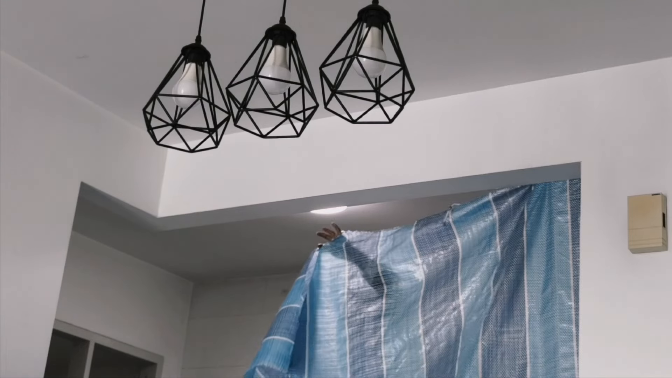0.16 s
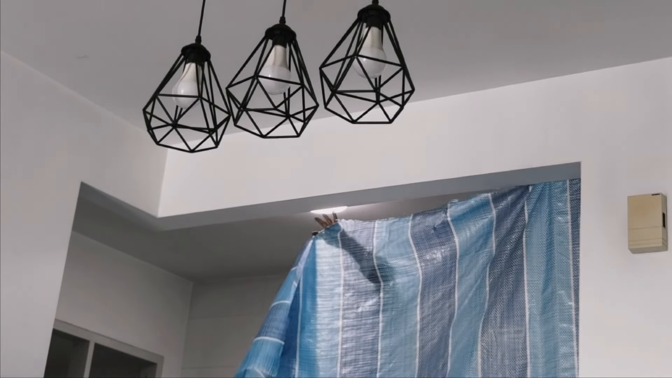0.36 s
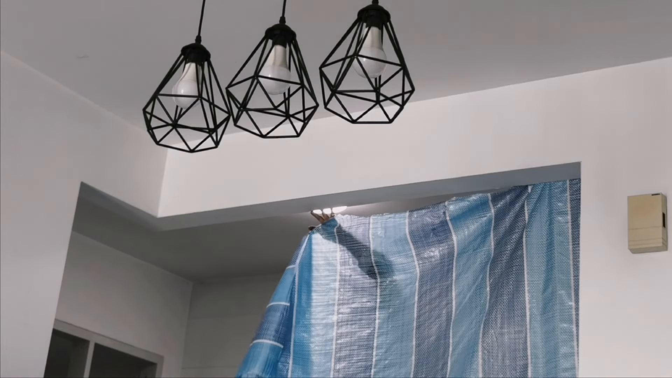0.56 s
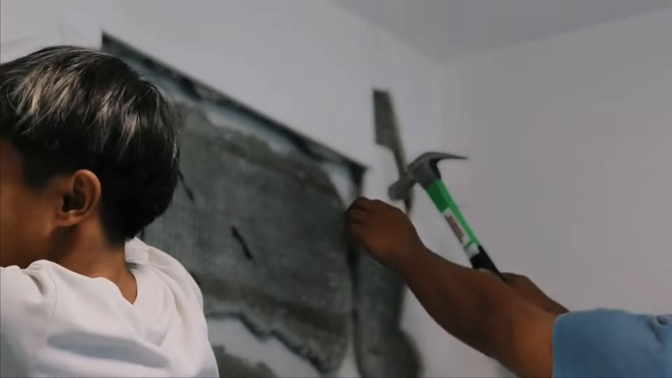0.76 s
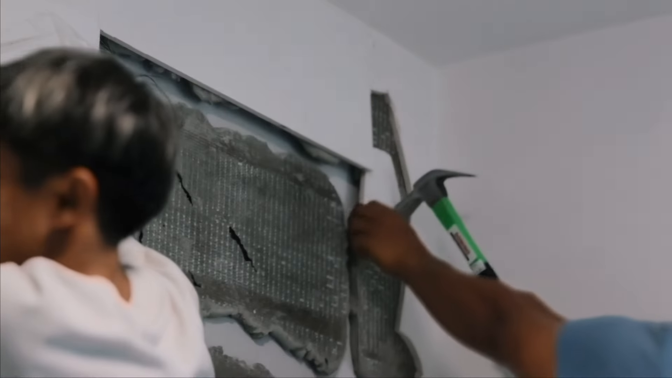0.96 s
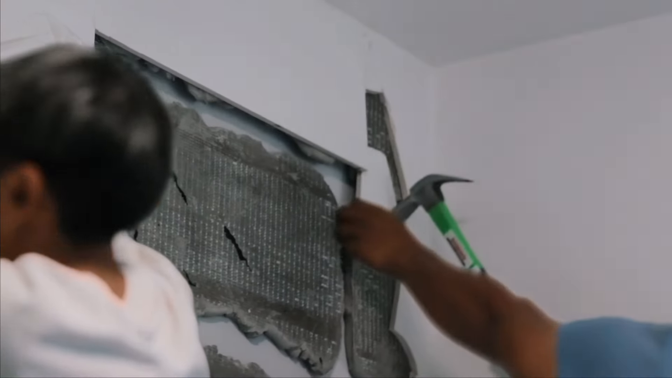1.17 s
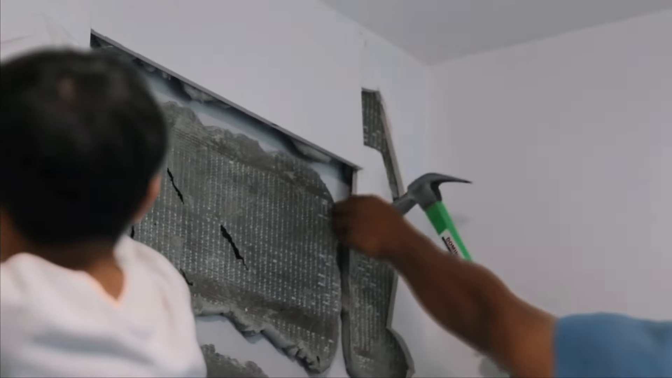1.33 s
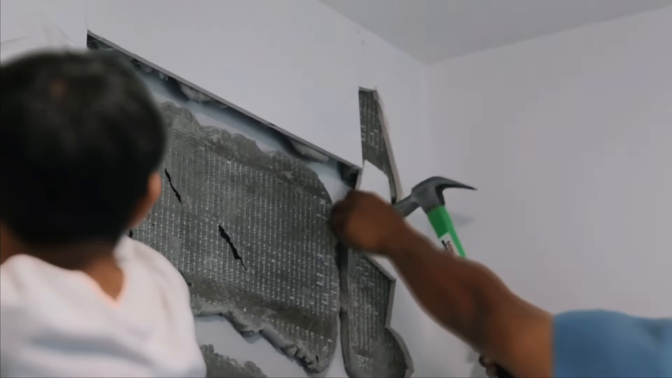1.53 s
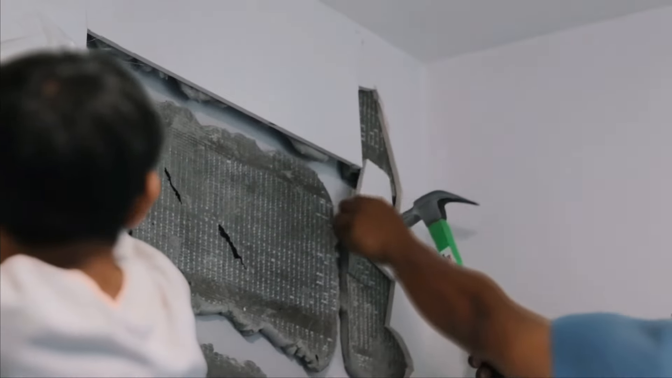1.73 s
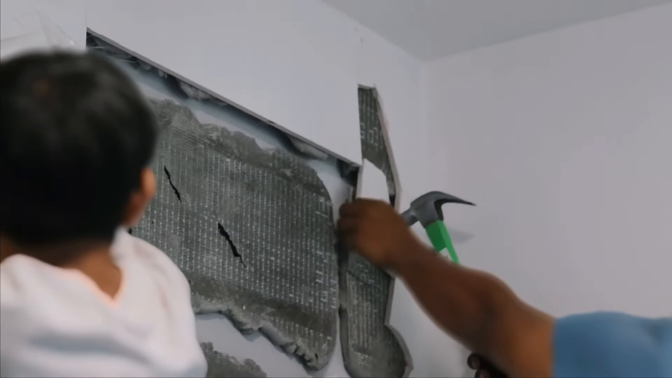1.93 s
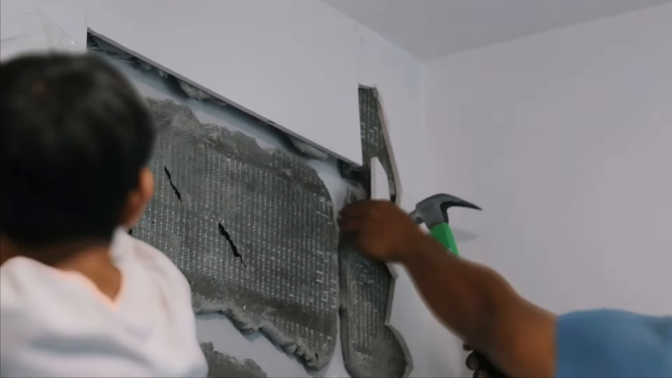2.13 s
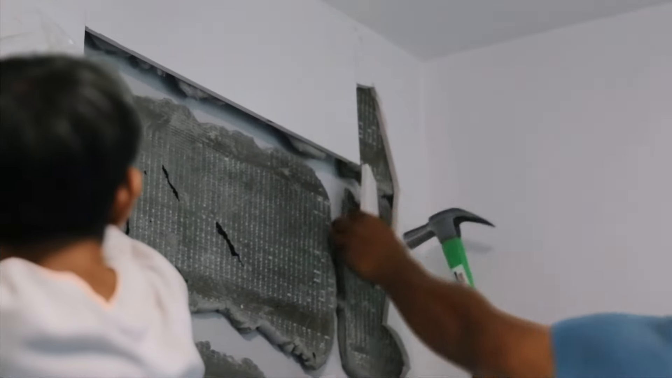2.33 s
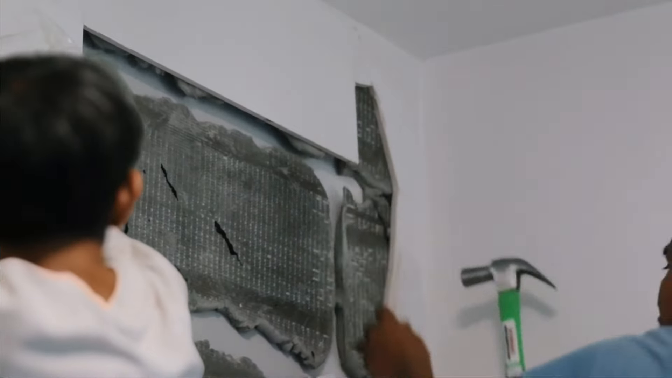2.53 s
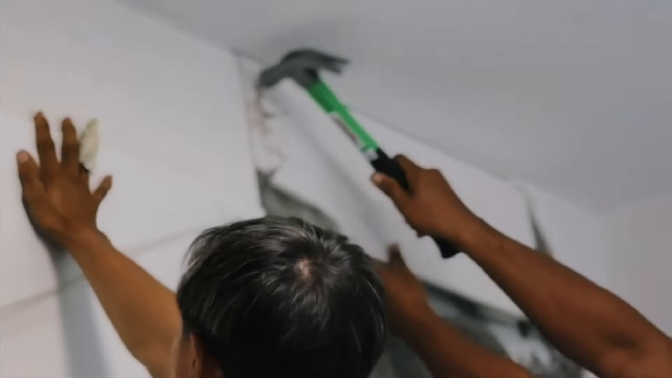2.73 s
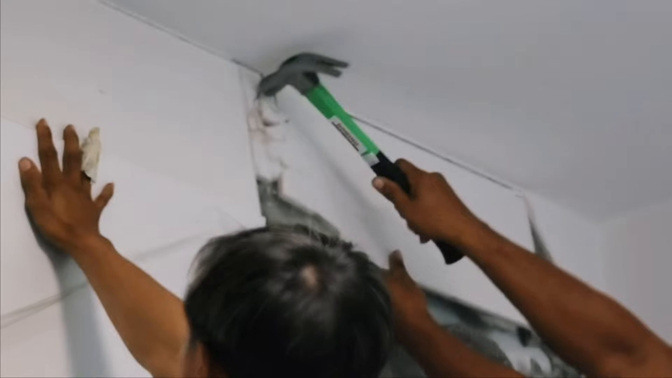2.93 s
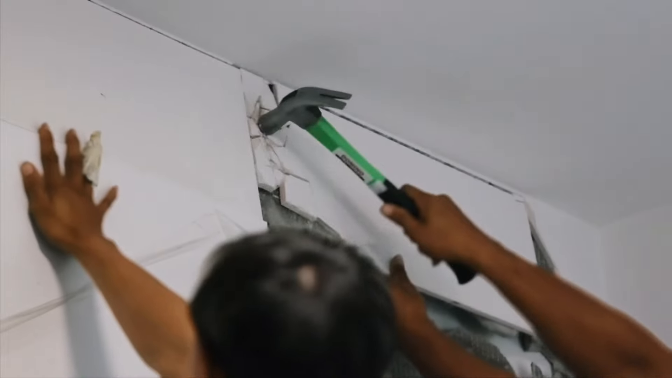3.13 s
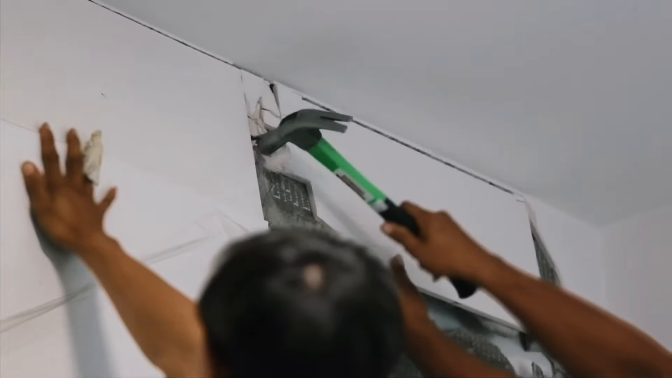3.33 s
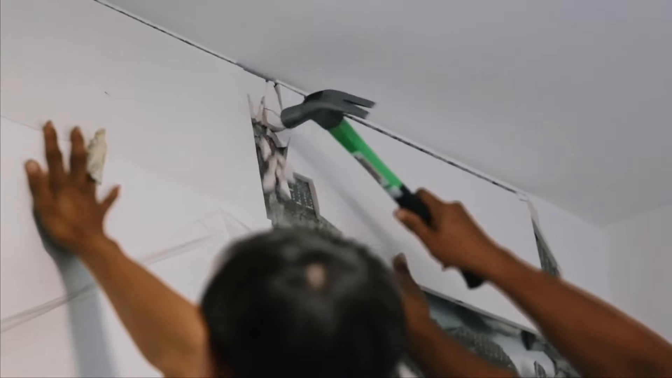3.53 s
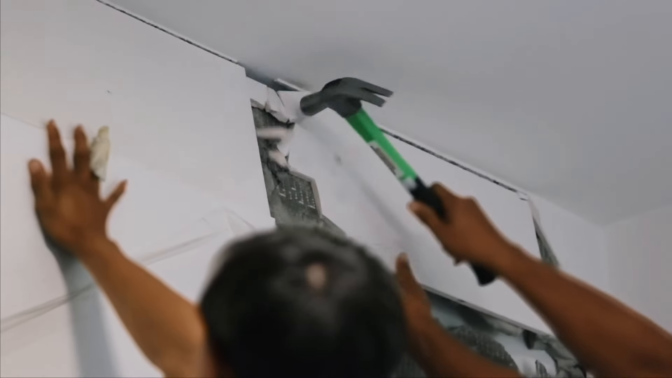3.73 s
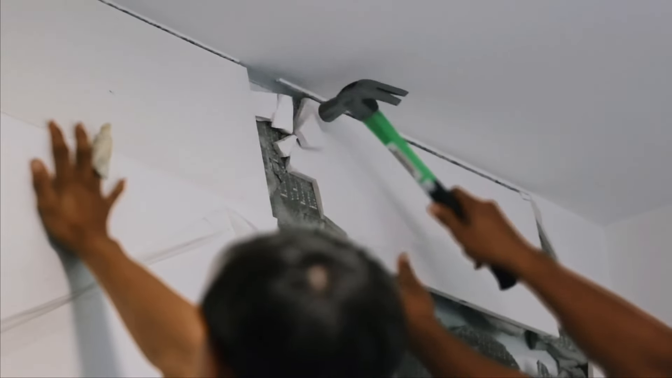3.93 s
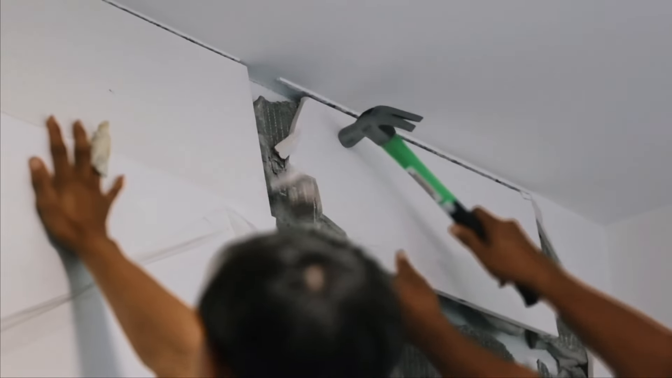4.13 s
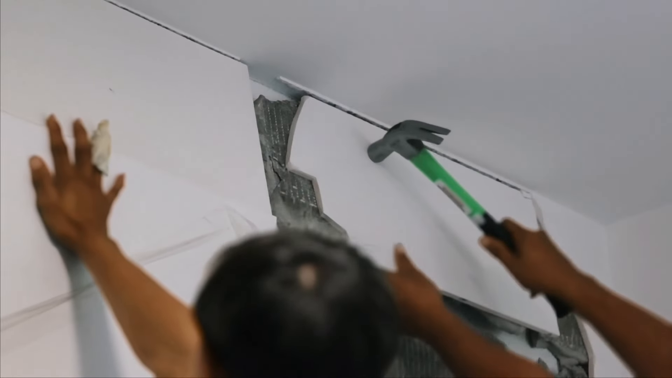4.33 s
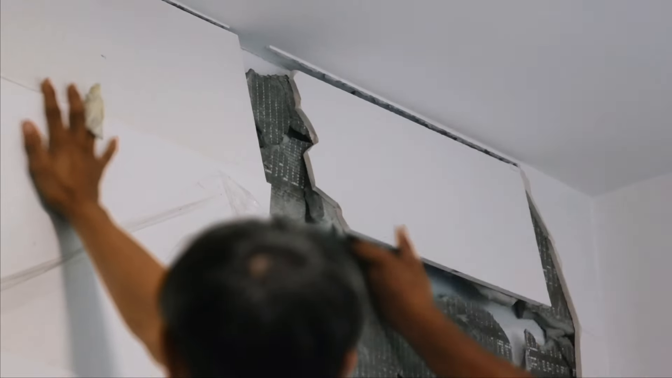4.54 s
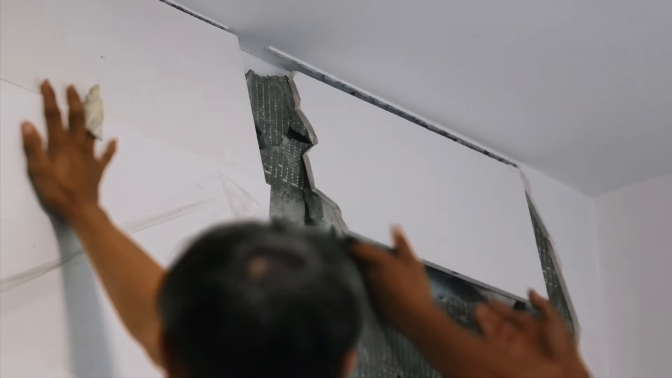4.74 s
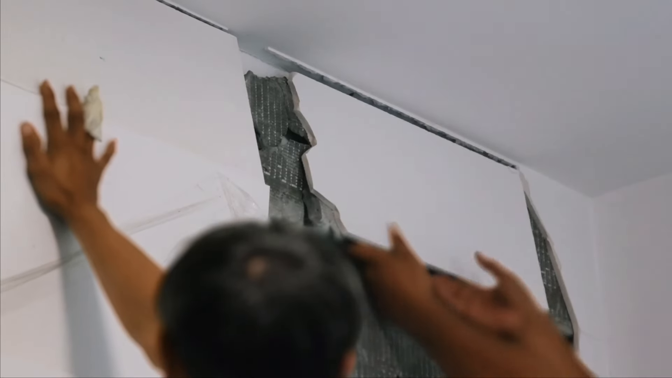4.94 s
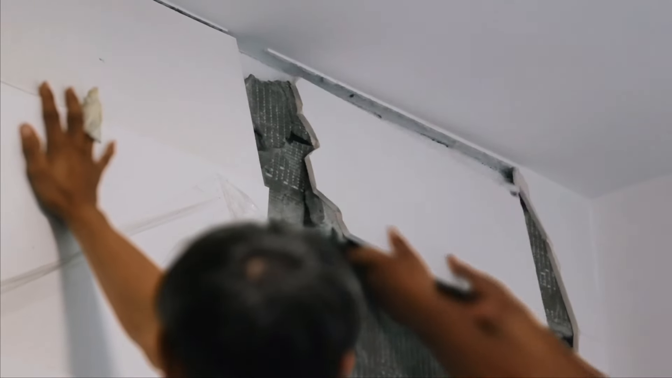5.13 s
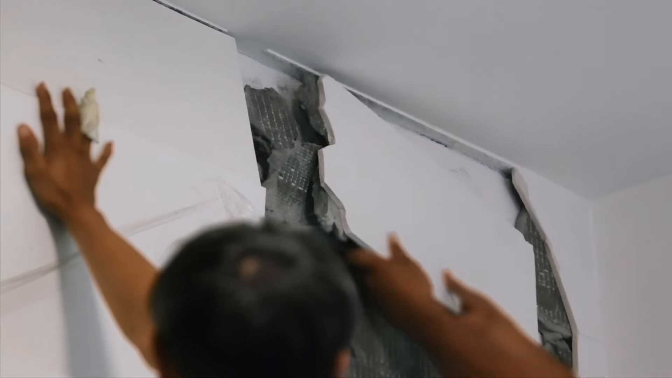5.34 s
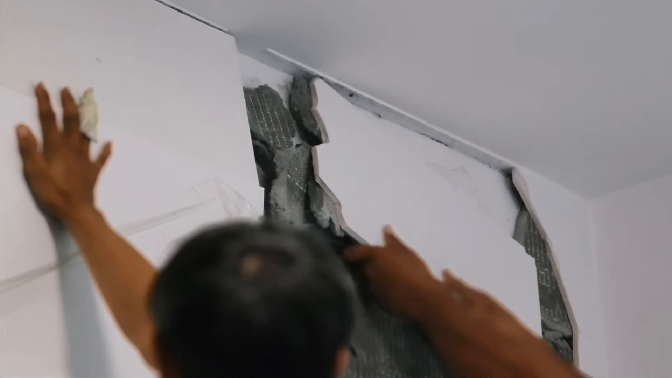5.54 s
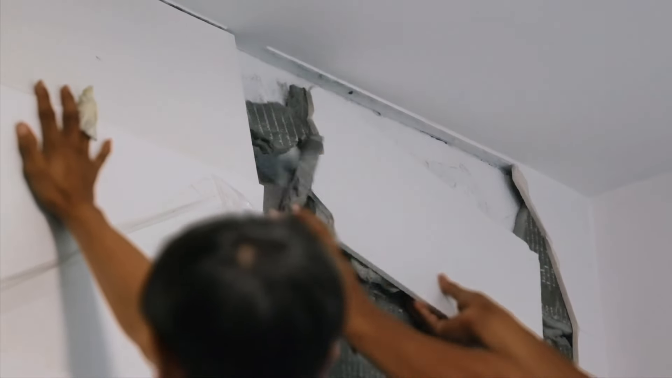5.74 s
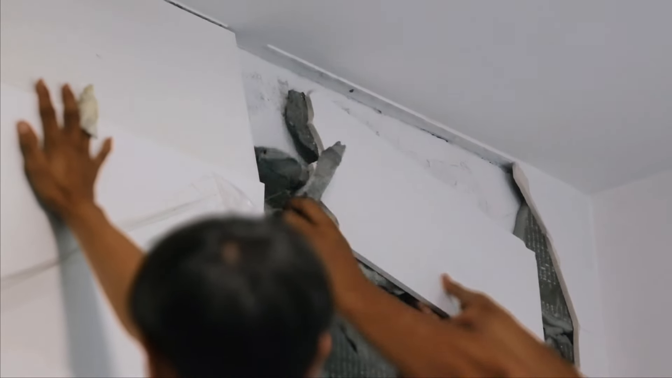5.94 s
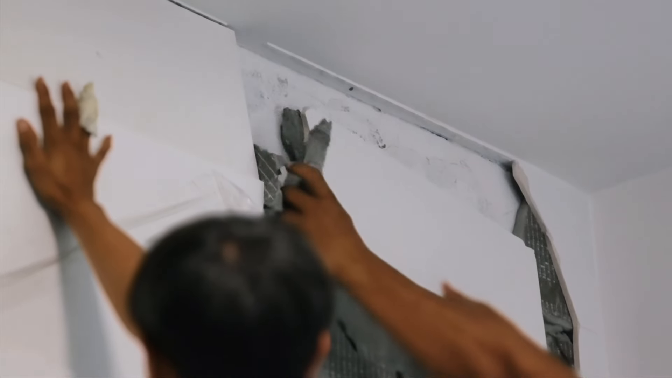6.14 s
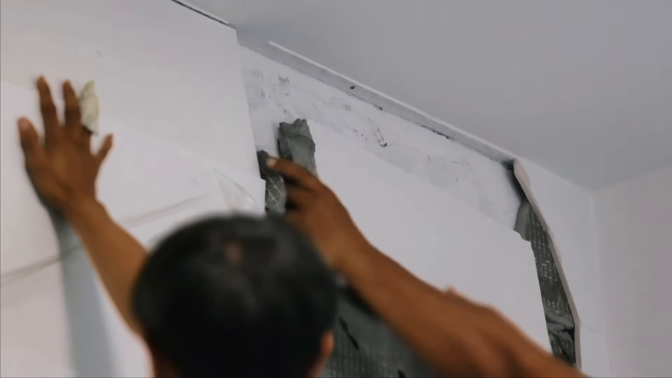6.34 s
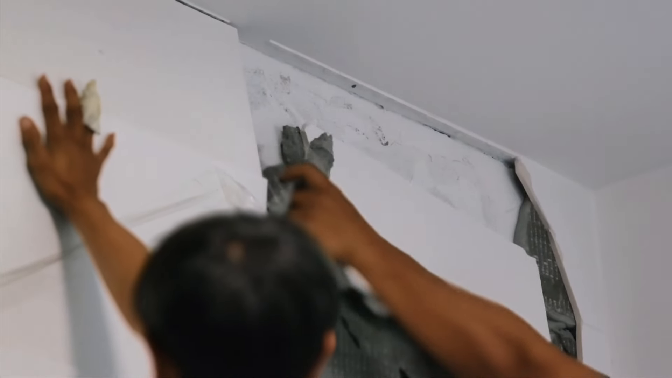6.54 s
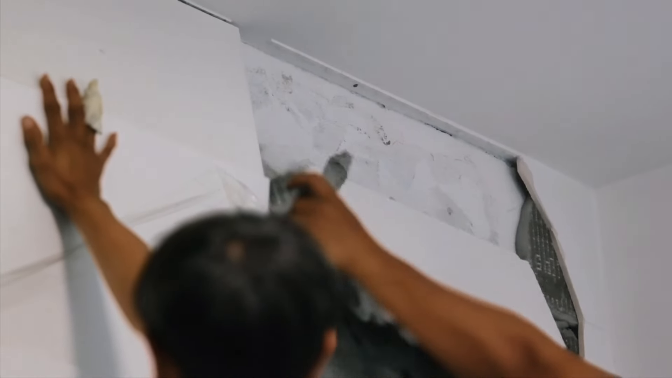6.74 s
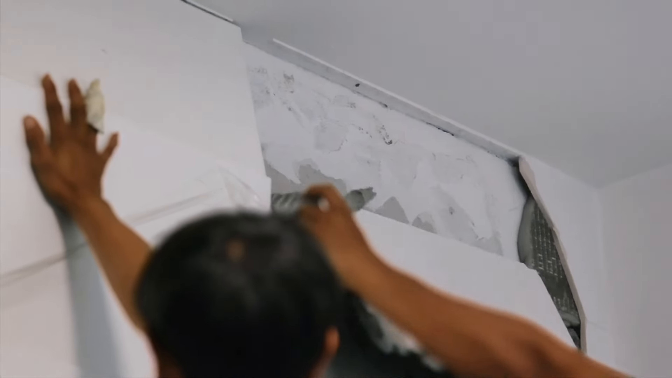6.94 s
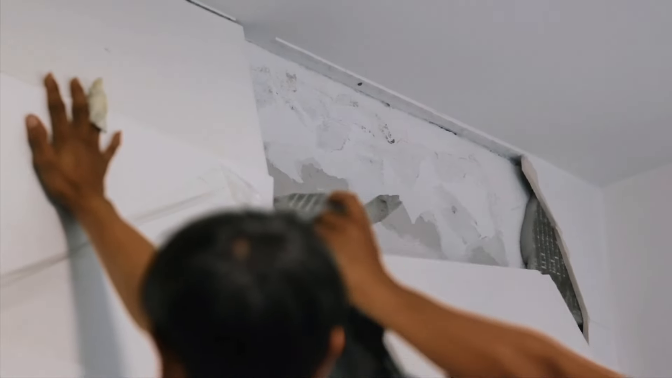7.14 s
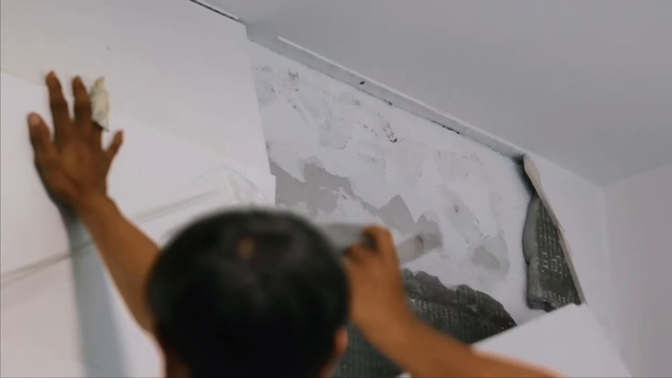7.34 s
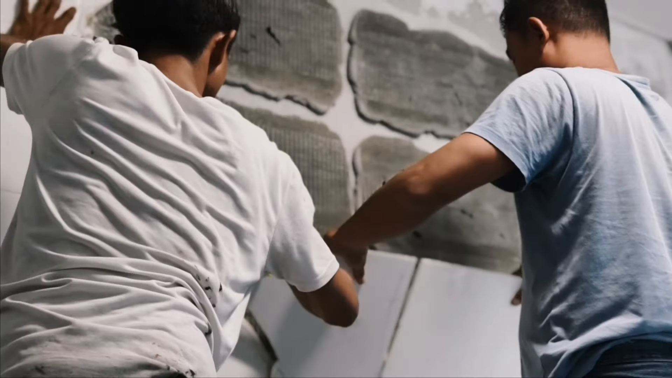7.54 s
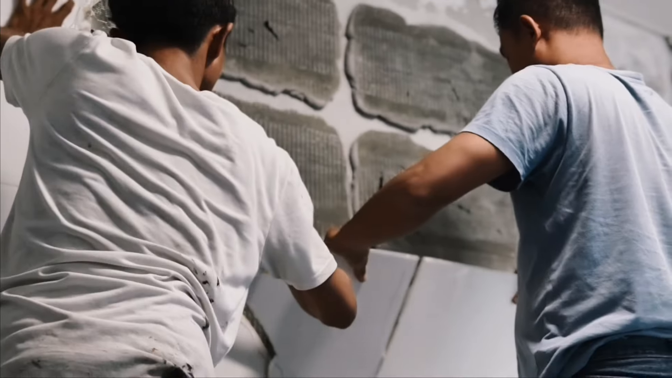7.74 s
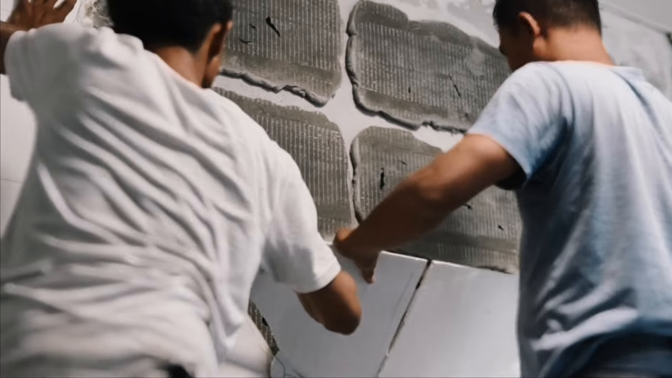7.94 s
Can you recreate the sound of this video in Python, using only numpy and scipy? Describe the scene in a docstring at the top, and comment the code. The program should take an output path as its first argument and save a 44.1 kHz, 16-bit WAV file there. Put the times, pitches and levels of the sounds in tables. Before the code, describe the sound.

A hammer knocks tiles off a bare kitchen wall, ceramic cracking, shattering and clattering down in irregular clusters with gritty mortar crunches and room echo.

```python
"""Prising tiles off a kitchen wall

Tiles are hammered and prised off in a bare kitchen, in five stretches of work joined by hard cuts.
Blows, glaze, mortar and shards are fracture pulses that ring resonances and broken pieces, heard through a hard room.
Clear notes are decaying sines, the blade squeak is stick-slip through steel modes, grit is random clicks.
A motor hum under the first stretch is steady sines; room tone and rumble are shaped noise."""
import sys
import numpy as np
from scipy import signal
from scipy.fft import rfft, irfft, next_fast_len
from scipy.io import wavfile

SR = 44100
rng = np.random.default_rng(int(sys.argv[2]) if len(sys.argv) > 2 else 0)


def file_out(sig):
    """Save sig as 16-bit WAV at sys.argv[1]."""
    # one column per channel
    cols = np.atleast_2d(sig).T
    # limit, then scale
    lim = np.clip(cols, -1, 1)
    pcm = np.round(lim * 32767).astype(np.int16)
    wavfile.write(sys.argv[1], SR, pcm)


N = 352359
EDGES_HZ = np.geomspace(24, 17000, 20)   # half-octave bands
CENTRES_HZ = np.sqrt(EDGES_HZ[1:] * EDGES_HZ[:-1])
TAIL_S = np.arange(int(.9 * SR)) / SR   # time axis of one hit
LEAD_S = .004   # splitting ahead of each contact
TILT_HZ = 2400   # pivot of every tilt: a harder contact sounds brighter


def from_db(db):
    """Decibels to amplitude gain."""
    return 10 ** (np.asarray(db) / 20)


def at_hz(points, hz):
    """Interpolate a (Hz, value) table on a log-frequency axis."""
    known_hz, values = np.transpose(points)
    return np.interp(np.log(np.maximum(hz, 1)), np.log(known_hz), values)


def band(x, k):
    """Band k of the half-octave bank."""
    sos = signal.butter(2, EDGES_HZ[k:k + 2], "band", fs=SR, output="sos")
    return signal.sosfilt(sos, x + 1e-18)


def split_filter(x, hz, kind):
    """Third-order low or high pass."""
    return signal.sosfilt(signal.butter(3, hz, kind, fs=SR, output="sos"), x + 1e-18)


def dying(t60_s):
    """Exponential envelope that loses 60 dB in t60_s."""
    return np.exp(-np.log(1000) * TAIL_S / t60_s)


def ringing(x, modes):
    """Sum of two-pole resonances excited by x; a narrower mode rings longer."""
    out = np.zeros_like(x)
    for hz, width_hz, db in modes:
        radius = np.exp(-np.pi * width_hz / SR)
        poles = [1, -2 * radius * np.cos(2 * np.pi * hz / SR), radius * radius]
        gain = from_db(db) * (1 - radius * radius) / 2
        out += gain * signal.lfilter([1, 0, -1], poles, x + 1e-18)
    return out


# Hard cuts between stretches, outer ends included: times in seconds.
CUTS_S = [0, .655, 2.626, 4.48, 7.525, 8]


def add(track, s, sound):
    """Lay a sound in at time s; it stops at the next cut."""
    s = max(s, 0)
    start = int(s * SR)
    next_cut_s = CUTS_S[np.searchsorted(CUTS_S, s, "right")]
    stop = min(start + sound.shape[1], int(next_cut_s * SR), N)
    track[:, start:stop] += sound[:, :stop - start]


def diffuse(k, size, alike_hz=450):
    """Stereo noise in one band: long waves reach both microphones alike."""
    alike = 1 / (1 + (CENTRES_HZ[k] / alike_hz) ** 2)
    mid, side = band(rng.standard_normal((2, size)), k)
    return np.sqrt((1 + alike) / 2) * mid + np.sqrt((1 - alike) / 2) * side * [[1], [-1]]


# Reverberation of the corner being worked on. Each row: frequency in Hz, t60 in seconds.
CORNER_T60 = [(190, 0.5), (700, .26), (2400, 0.19), (6200, 0.18), (12500, 0.22)]
# Reverberation of the whole room. Each row: frequency in Hz, t60 in seconds.
ROOM_T60 = [(190, 1), (700, 0.81), (2400, 0.75), (6200, 0.48), (12500, 0.33)]
# Straight path over the reflections. Each row: frequency in Hz, ratio in dB.
DIRECT = [(150, -8.5), (700, -29.5), (2400, -12), (9000, -18)]


def path(room_db=-11.0, build_cycles=0.99):
    """Banded response from one spot to the microphones: straight path, near walls, whole room."""
    click = np.zeros((2, len(TAIL_S)))
    click[[0, 1], rng.integers(size=2, low=0, high=6)] = 1   # arrival delay per side, samples
    bands = []
    for k, hz in enumerate(CENTRES_HZ):
        corner = dying(at_hz(CORNER_T60, hz))
        room = from_db(room_db) * dying(at_hz(ROOM_T60, hz))
        build_up = 1 - np.exp(-TAIL_S * hz / build_cycles)   # low notes take longer to fill the room
        echoes = diffuse(k, len(TAIL_S)) * np.hypot(corner, room) * build_up
        straight = band(click, k) * (-1) ** k
        echoes *= np.linalg.norm(straight) / np.linalg.norm(echoes)
        direct = from_db(at_hz(DIRECT, hz))
        bands.append((echoes + direct * straight) / np.hypot(1, direct))
    return np.array(bands)


def crumbs(size, per_s, spread_db):
    """Clicks at random moments, of uneven strength and either sign."""
    strength = from_db(spread_db * np.clip(rng.standard_normal(size), -2, 2))
    return (rng.random(size) < per_s / SR) * strength * rng.choice([-1, 1], size)


def fracture(crumble_s, grains_per_s, equal_s, spread_db, lead_db=-17, crumb_hz=330):
    """Faint splitting, main contact, then breaks bringing the contact's energy again every equal_s."""
    t = TAIL_S[:len(TAIL_S) // 2] - LEAD_S
    contact = np.zeros(len(t))
    contact[int(LEAD_S * SR)] = 1
    splitting = rng.standard_normal(len(t)) * (t < 0) * (1 + t / LEAD_S)
    breaks = crumbs(len(t), grains_per_s, spread_db) * (t > 0) * (t < crumble_s)
    force = contact + from_db(lead_db) * splitting / np.linalg.norm(splitting)
    force += breaks / (np.linalg.norm(breaks) + 1e-9) * np.sqrt(max(crumble_s, 0) / equal_s)
    # crumbs are too light to move the wall: bass from the main contact alone
    thud = split_filter(contact, crumb_hz, "low")
    return thud + split_filter(force / np.linalg.norm(force), crumb_hz, "high")


# Colour shared by all hits; the wall radiates deep bass poorly. Each row: frequency in Hz, gain in dB.
HIT_COLOUR = [(30, -26), (60, -13.5), (100, -5.5), (170, 1.5), (350, -2.5), (520, 3), (800, -1),
              (1200, 1.5), (1600, 1.5), (2300, 0)]


def hits(table, colour, spots, body, piece_db, grains_per_s, equal_s, spread_db, close_db,
         piece_width_hz=70, count=8, straight_s=0.0017):
    """Each hit rings its body and a broken piece with modes of its own, then fills the room."""
    out = np.zeros((2, N))
    sharpen = 1 + from_db(close_db) * np.exp(-TAIL_S / straight_s)   # close hits arrive more sharply
    tilt_octaves = np.log2(np.maximum(CENTRES_HZ, colour[0][0]) / TILT_HZ)
    colour_db = at_hz(colour, CENTRES_HZ) + at_hz(HIT_COLOUR, CENTRES_HZ)
    for i, (s, crumble_s, db, tilt) in enumerate(table):
        piece_hz = np.geomspace(2100, 11000, count) * 2 ** rng.uniform(-0.261, 0.292, count)
        piece = [(hz, piece_width_hz, piece_db) for hz in piece_hz]
        force = fracture(crumble_s, grains_per_s, equal_s, spread_db)
        force = force + ringing(force, list(body) + piece)
        gains = from_db(db + tilt * tilt_octaves + colour_db)
        response = np.tensordot(gains, spots[i % len(spots)], 1) * sharpen
        add(out, s - LEAD_S, signal.fftconvolve(response, force[None], axes=1))
    return out


# Hammer on tile. Each row: contact in seconds, crumbling time in seconds, relative level in dB,
# tilt in dB per octave.
BLOWS = [(2.633, 0.013, -13, -4), (2.8595, 0.0072, 5, -0.5), (3.078, 0.013, 7.5, 0.2),
         (3.331, 0.0062, -1, -3), (3.552, 0.056, 3.5, 1), (3.812, 0.0072, 1, -.2),
         (3.996, 0.028, 8.5, 1.75)]
# Spectrum of a blow. Each row: frequency in Hz, gain in dB.
BLOW_COLOUR = [(190, 6.5), (700, 5), (2400, -1), (6200, -3.5), (12500, -12)]
# Wall resonances. Each row: frequency in Hz, width in Hz, gain in dB.
WALL_MODES = [(99.5, 9.1, 3), (142.5, 11, -10), (187, 18, 4), (243, 5.5, -5), (274.6, 26, 1)]


def hammer_blows(spots):
    """Hammer blows thud in the low modes of the wall, with dense crumbling."""
    return from_db(-1.47) * hits(BLOWS, BLOW_COLOUR, spots, WALL_MODES, piece_db=5.5,
                                 grains_per_s=1500, equal_s=.055, spread_db=3.5, close_db=-2.5)


# Pieces of a shattering tile. Each row: contact in seconds, crumbling time in seconds,
# relative level in dB, tilt in dB per octave.
SHATTERS = [(4.03, 0.031, 14, .5), (4.062, .037, 11.5, -1.5), (4.095, 0.048, 6, 0), (4.161, .018, 11.5, .7),
            (4.205, 0.058, 14, 0), (4.245, 0.043, 6.5, -2.5), (4.295, 0.051, 11.5, -0.5),
            (4.33, 0.036, 4, -0.5), (4.437, .016, -2, -0.5)]
# Spectrum of a shattering piece. Each row: frequency in Hz, gain in dB.
SHATTER_COLOUR = [(190, -13), (500, -4.5), (1000, -4), (2400, -0.5), (6200, -4.5), (12500, -12)]
# Tile resonances, shared with falling pieces. Each row: frequency in Hz, width in Hz, gain in dB.
TILE_MODES = [(1200, 87, -0.5), (2150, 130, -2), (2424, 130, 3), (2650, 42, -9.5), (3040, 80, -5),
              (3500, 38, 4.5), (3970, 110, 4.5), (4780, 50, -11), (5500, 100, 1), (7290, 87, 5)]


def shattering_tile(spots):
    """A tile shatters piece after piece, each break ringing the tile modes."""
    return from_db(-2.1) * hits(SHATTERS, SHATTER_COLOUR, spots, TILE_MODES, piece_db=0.0,
                                grains_per_s=260, equal_s=0.01, spread_db=3.0, close_db=-13)


# Pieces land and skitter below. Each row: contact in seconds, crumbling time in seconds,
# relative level in dB, tilt in dB per octave.
FALLS = [(.004, 0.029, -9.5, -5), (.143, 0.071, -4.5, -3.5), (5.711, 0.034, 5.5, -2), (5.735, 0.08, 7, -1),
         (5.8245, 0.0094, 13, 0), (6.021, 0.034, -16, 10), (6.201, 0.071, -16, -6.5),
         (6.272, 0.011, -10, -6), (6.348, 0.059, -5, -3), (6.406, 0.031, 16, 1.2),
         (6.432, 0.027, 12.5, 2.5), (6.465, 0.043, 16.5, 0), (7.671, 0.051, 3, -2), (7.73, 0.021, 0.5, -1)]
# Spectrum of a landing. Each row: frequency in Hz, gain in dB.
FALL_COLOUR = [(120, -8.5), (250, -5.5), (700, -2.5), (2400, 0), (6200, -11), (10000, -22.5),
               (14000, -25.5)]


def falling_pieces(spots):
    """Landing pieces ring the tile modes, with sparse uneven breaks."""
    return from_db(-2.0) * hits(FALLS, FALL_COLOUR, spots, TILE_MODES, piece_db=1.0,
                                grains_per_s=260, equal_s=0.016, spread_db=4.5, close_db=-19)


# Glaze snaps as a tile gives way. Each row: contact in seconds, crumbling time in seconds,
# relative level in dB, tilt in dB per octave.
SNAPS = [(.844, .002, -23, -3.5), (1.035, 0.022, -10, -2.5), (1.556, 0.027, 6.5, -1),
         (1.945, 0.0033, -34.5, 5.5), (2.079, 0.0025, -29, -5.5), (2.174, 0.0018, -29, -5),
         (2.756, 0.012, -4.5, -5), (2.844, .002, -22, 1.5), (3.058, 0.016, -19, 1),
         (3.245, 0.019, -6.5, -2), (3.514, 0.022, -10.5, -3.5), (3.577, 0.0214, 8, -3),
         (5.074, .002, -24.5, 3), (5.294, 0.01, -18, -2.5), (5.316, .002, -18.5, 2.5),
         (7.893, .002, -25, 4), (7.945, 0.054, -9, -1.5)]
# Spectrum of a snap. Each row: frequency in Hz, gain in dB.
SNAP_COLOUR = [(190, -31), (850, -17), (1250, -5.5), (2400, -0.5), (3300, -3), (5200, 1), (8500, 1),
               (12500, 0)]


def glaze_snaps(spots):
    """Brittle glaze releases short bright fractures with little bass."""
    return from_db(-1.2) * hits(SNAPS, SNAP_COLOUR, spots, [], piece_db=0.5,
                                grains_per_s=550, equal_s=0.042, spread_db=2.5, close_db=-13)


# Mortar under hand and blade. Each row: contact in seconds, crumbling time in seconds,
# relative level in dB, tilt in dB per octave.
CRUNCHES = [(.966, .002, -26, -3), (1.11, .006, -24, -4.5), (1.63, 0.012, -4, 2), (5.215, 0.0035, -15.5, 2),
            (5.36, 0.06, -13, -2), (5.439, .01, -1, 1.6), (5.585, 0.011, -6, 1), (6.914, 0.014, -6.5, -0.5),
            (6.956, 0.086, -2.5, 0.5), (7.094, 0.054, -7.5, 0), (7.298, 0.014, -10, -5.5),
            (7.372, 0.027, -7.5, -1), (7.407, .004, -13, -2), (7.54, 0.052, -8.5, 3),
            (7.586, 0.035, -3, .5)]
# Spectrum of a crunch. Each row: frequency in Hz, gain in dB.
CRUNCH_COLOUR = [(190, -2.5), (700, 1), (2400, -1.5), (6200, -13), (12500, -27)]


def mortar_crunches(spots):
    """Mortar crumbles in sparse uneven breaks, dull in the treble."""
    return from_db(-2.0) * hits(CRUNCHES, CRUNCH_COLOUR, spots, [], piece_db=-1.5,
                                grains_per_s=300, equal_s=0.068, spread_db=4, close_db=-13)


# Loose tiles knock. Each row: contact in seconds, crumbling time in seconds,
# relative level in dB, tilt in dB per octave.
BUMPS = [(.798, 0.0025, -22, 1), (1.317, 0.03, -33, 0.5), (2.135, .019, -34, 0), (2.783, .003, -17, 2.5),
         (5.585, 0.013, -16, 0.5), (5.99, 0.027, -14.5, 0.5), (7.298, .012, -14.5, 0)]
# Spectrum of a knock. Each row: frequency in Hz, gain in dB.
BUMP_COLOUR = [(190, 2), (450, 14.5), (750, 20), (1200, 11), (2400, -5.5), (6200, -16), (12500, -13)]


def hollow_bumps(spots):
    """Loose tiles knock hollowly, strongest around 750 Hz."""
    return from_db(-2.3) * hits(BUMPS, BUMP_COLOUR, spots, [], piece_db=7,
                                grains_per_s=470, equal_s=0.047, spread_db=3.0, close_db=-16)


# Hands and heavy pieces on the wall. Each row: contact in seconds, crumbling time in seconds,
# relative level in dB, tilt in dB per octave.
THUDS = [(4.642, 0.034, -18.5, -1), (5.294, .013, -24, .5), (5.5, 0.073, -19, 1.5),
         (5.645, 0.041, -19.5, -1), (6.021, .045, -20.5, -0.5), (6.201, 0.056, -21.5, 0.5),
         (7.1, .02, -15.5, 0)]
# Spectrum of a thump. Each row: frequency in Hz, gain in dB.
THUD_COLOUR = [(70, 23), (200, 22.5), (700, 12.5), (2400, -0.5), (6200, -11), (12500, -25)]


def wall_thumps(spots):
    """Soft heavy contacts put most of their energy in the bass."""
    return from_db(-1.8) * hits(THUDS, THUD_COLOUR, spots, [], piece_db=2,
                                grains_per_s=550, equal_s=0.059, spread_db=0.5, close_db=-18)


# Clear notes. Each row: start in seconds, frequency in Hz, level before the dry/wet mix in dB,
# t60 in seconds.
NOTES = [(.004, 830, -38, 0.19), (.004, 1540, -49.5, 0.85), (.004, 2180, -46, .4),
         (1.557, 1710, -39.5, 0.42), (1.557, 5300, -30, 0.17), (1.56, 6140, -36, 0.17),
         (1.738, 1780, -37, 0.055), (2.372, 2110, -43, 0.042), (2.86, 7010, -29, 0.047),
         (3.078, 5900, -32, 0.064), (3.572, 184, -29, 0.24), (3.577, 5770, -30, 0.084),
         (3.812, 535, -27.5, 0.13), (3.812, 957, -24, 0.04), (3.998, 48, -41, .16),
         (4.165, 4964, -22.5, 0.16), (4.18, 2515, -28, 0.36), (4.247, 510, -31.5, 0.15),
         (4.642, 97, -33.5, 0.16), (5.912, 2130, -35, 0.11), (6.021, 6880, -33, 0.078),
         (6.201, 6870, -44.5, 0.1), (6.465, 2384, -36, 0.82), (7.671, 1170, -33, 0.06)]


def clinks(spots, dry_db=-5, wet_db=-4):
    """Free pieces and hollow patches ring on as decaying sines, dry and through the room."""
    out = np.zeros((2, N))
    rooms = [spot.sum(0) for spot in spots]
    for i, (s, hz, db, t60_s) in enumerate(NOTES):
        note = from_db(db) * np.sin(2 * np.pi * hz * TAIL_S) * dying(t60_s)
        echo = signal.fftconvolve(rooms[i % len(rooms)], note[None], axes=1)[:, :len(TAIL_S)]
        add(out, s, from_db(dry_db) * note + from_db(wet_db) * echo)
    return out


# Blade slips behind a tile. Each row: peak in seconds, level before the room in dB.
SLIPS = [(1.723, -48), (1.742, -56), (2.374, -54), (2.414, -49.5), (2.474, -49), (2.535, -50.5),
         (2.576, -50.5)]
# Blade resonances. Each row: frequency in Hz, width in Hz, gain in dB.
BLADE_MODES = [(1738, 96, -0.5), (2020, 220, -9), (4055, 46, 0.5), (5270, 32, -11.5), (6170, 30, -3.5),
               (7170, 95, -27), (9100, 32, -13), (11500, 110, -17), (13020, 66, -33)]


def squeak(spot, slips_per_s=900, spread_db=3, rise_s=0.011, fall_s=0.011):
    """The steel blade sticks and slips on the tile edge, and sings in its own modes."""
    t = np.arange(N) / SR
    pressure = np.zeros(N)
    for s, db in SLIPS:
        pressure += from_db(db) * np.exp(-np.maximum((s - t) / rise_s, (t - s) / fall_s))
    song = ringing(crumbs(N, slips_per_s, spread_db), BLADE_MODES)
    source = song / song.std() * pressure + 1e-18
    return signal.oaconvolve(source[None], spot.sum(0), axes=1)[:, :N]


# Runs of loose grit. Each row: start in seconds, level before colour and room in dB,
# tilt in dB per octave, fading in dB per second.
TRICKLES = [(0, -47, 1.5, 10.5), (.66, -61, 4, 16.5), (2.63, -47, 4.5, 4), (4.485, -57.5, 4.5, 5.5),
            (5.349, -47, 2.5, 5), (6.92, -47.5, 0.5, 20.5), (7.528, -41.5, 7, 40)]
# Spectrum of grit. Each row: frequency in Hz, gain in dB.
GRIT_COLOUR = [(60, -7), (300, 4), (800, 8.5), (2400, 0), (6200, -13.5), (10000, -16.5), (14500, -22)]


def grit(spot, grains_per_s=170, spread_db=5):
    """Crumbs of mortar patter down the wall as random clicks, in fading runs."""
    out = np.zeros((2, N))
    t = np.arange(N // 2) / SR
    tilt_octaves = np.log2(np.maximum(CENTRES_HZ, 500) / TILT_HZ)
    for s, db, tilt, fading_db_per_s in TRICKLES:
        grains = crumbs(len(t), grains_per_s, spread_db)
        grains = grains / grains.std() * from_db(db - fading_db_per_s * t)
        gains = from_db(tilt * tilt_octaves + at_hz(GRIT_COLOUR, CENTRES_HZ))
        response = np.tensordot(gains, spot, 1)[:, :len(TAIL_S) // 4]
        add(out, s, signal.oaconvolve(grains[None], response, axes=1))
    return out


# Motor hum. Each row: frequency in Hz, RMS level in dB.
HUM = [(57, -55.5), (115, -65), (320, -66.5)]


def hum():
    """A motor drones as steady sines during the first stretch."""
    t = np.arange(N) / SR
    drone = np.zeros(N)
    for hz, db in HUM:
        drone += np.sqrt(2) * from_db(db) * np.sin(2 * np.pi * (hz * t + rng.random()))
    return drone * (t < CUTS_S[1])


# Room tone spectrum. Each row: frequency in Hz, gain in dB.
ROOM_TONE = [(30, -14), (60, -2.5), (150, 5.5), (300, -8), (700, -11), (2400, -23.5), (6200, -24),
             (15000, -64)]
# Building rumble spectrum. Each row: frequency in Hz, gain in dB.
RUMBLE = [(28, -6), (40, -16), (58, -12), (85, -29), (150, -30), (300, -12), (700, -20), (3000, -35.5)]


def air(tone_db, rumble_db):
    """Room tone and building rumble: banded noise, steady within each stretch."""
    tone, rumble = from_db(tone_db), from_db(rumble_db)
    out = np.zeros((2, N))
    for k, hz in enumerate(CENTRES_HZ):
        level = tone * from_db(at_hz(ROOM_TONE, hz)) + rumble * from_db(at_hz(RUMBLE, hz))
        out += diffuse(k, N) * level
    return out


# Left microphone response. Each row: frequency in Hz, gain in dB.
LEFT_MIC = [(1000, -1.5), (4000, -0.5), (5200, -4), (6400, -4), (7600, -3.5), (9500, 0.5), (11500, -10.5),
            (13500, 1.5), (15500, -16)]
# Right microphone response, two strong treble peaks. Each row: frequency in Hz, gain in dB.
RIGHT_MIC = [(1000, -1), (4000, 1.5), (5300, 7.5), (6600, 9), (8200, 2.5), (10000, 0.5), (11500, -3),
             (13300, 12.5), (15500, 7.5)]


def microphones(x, facing):
    """Blend in each microphone's colour as the work faces the right one more squarely."""
    size = next_fast_len(N + len(TAIL_S))
    hz = np.arange(size // 2 + 1) * SR / size
    response = from_db([at_hz(LEFT_MIC, hz), at_hz(RIGHT_MIC, hz)])
    coloured = irfft(rfft(x, size) * response, size)[:, :N]
    return x + facing * (coloured - x)


# Stretches between cuts. Each row: room tone gain in dB, rumble gain in dB,
# how squarely the work faces the right microphone from 0 to 1.
STRETCHES = [(-42.5, -32.5, 0.06), (-51, -54, 0.83), (-52, -96, 0.82), (-44, -46.5, 0.86), (-39, -41, 0.04)]


def scene(count=7):
    """Hammer, blade and falling pieces at several spots in the room, over hum and air."""
    stretch = np.searchsorted(CUTS_S, np.arange(N) / SR, "right") - 1
    tone_db, rumble_db, facing = np.array(STRETCHES)[stretch].T
    spots = [path() for _ in range(count)]
    work = hammer_blows(spots) + shattering_tile(spots) + falling_pieces(spots)
    work += glaze_snaps(spots) + mortar_crunches(spots)
    work += hollow_bumps(spots) + wall_thumps(spots)
    work += clinks(spots) + squeak(spots[1]) + grit(spots[0])
    return microphones(work + hum() + air(tone_db, rumble_db), facing)


def record(dry, cutoff_hz=15250):
    """Steep elliptic low pass: 0.2 dB ripple, 80 dB stopband."""
    return signal.sosfilt(signal.ellip(10, .2, 80, cutoff_hz, fs=SR, output="sos"), dry)


dry = scene()
out = record(dry)
file_out(out)
```